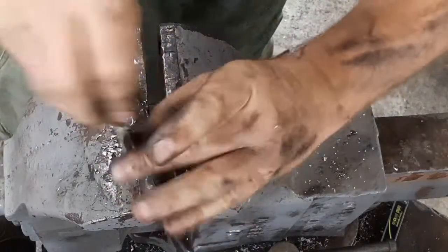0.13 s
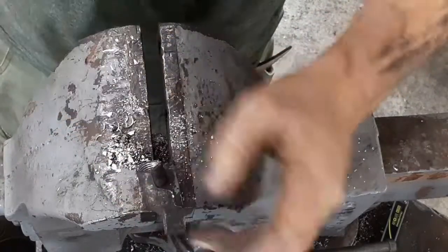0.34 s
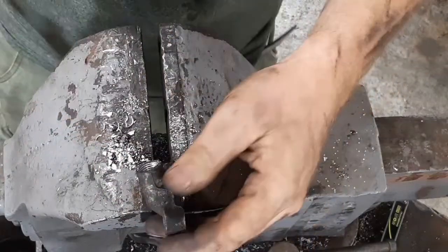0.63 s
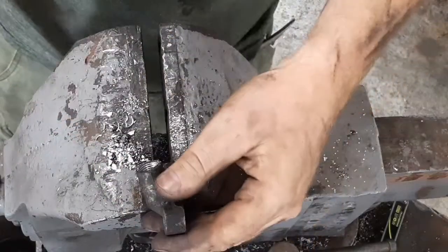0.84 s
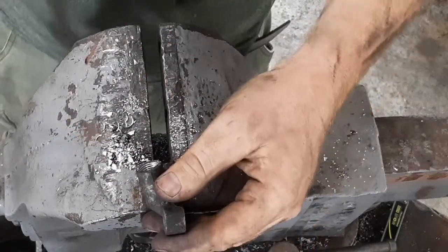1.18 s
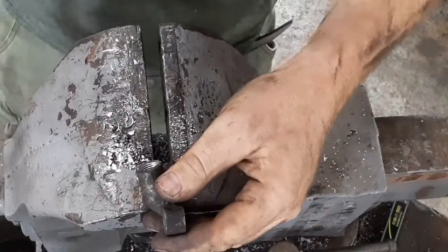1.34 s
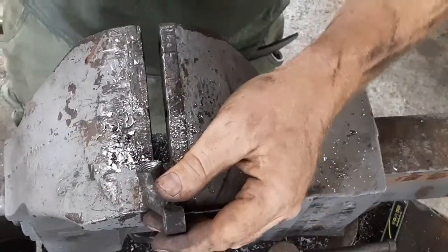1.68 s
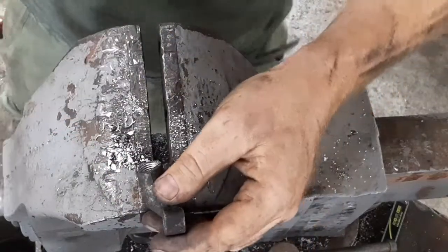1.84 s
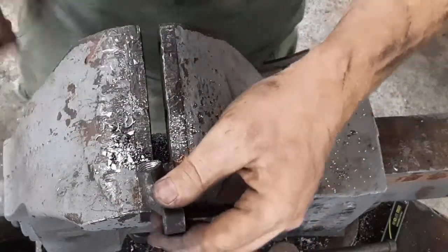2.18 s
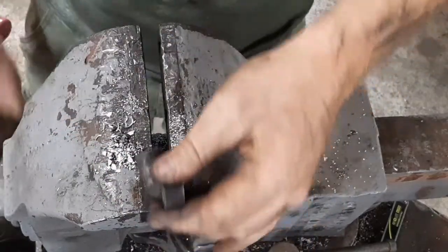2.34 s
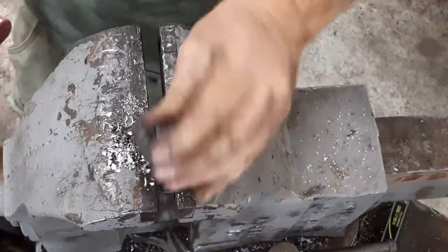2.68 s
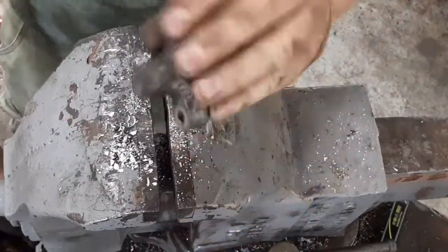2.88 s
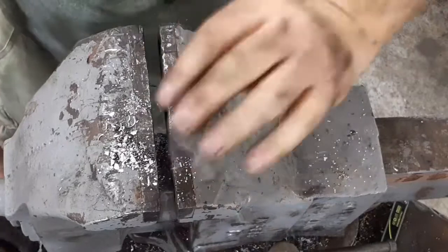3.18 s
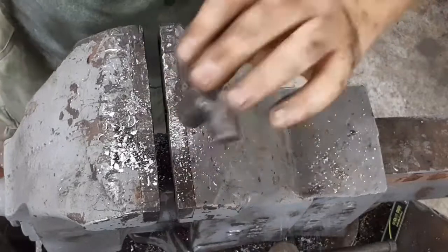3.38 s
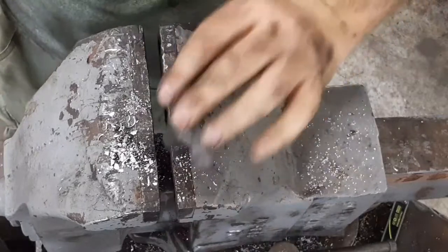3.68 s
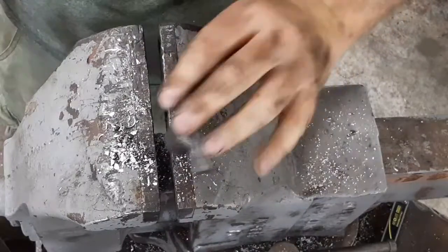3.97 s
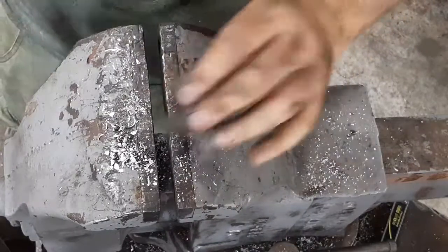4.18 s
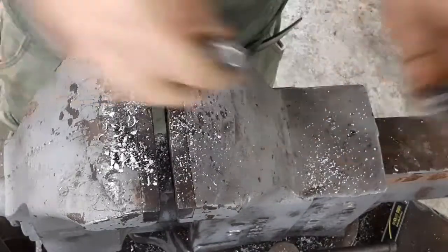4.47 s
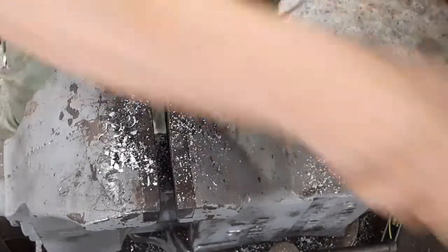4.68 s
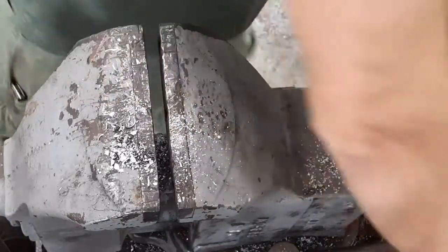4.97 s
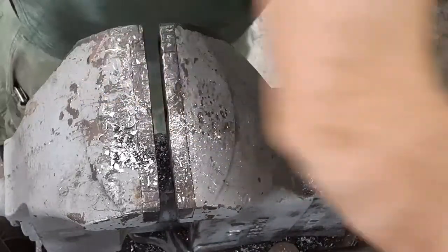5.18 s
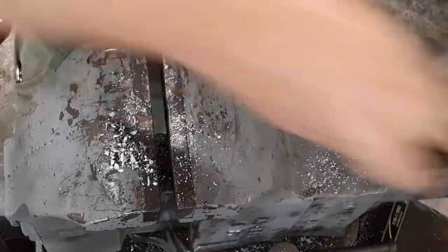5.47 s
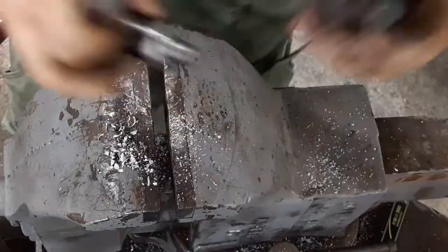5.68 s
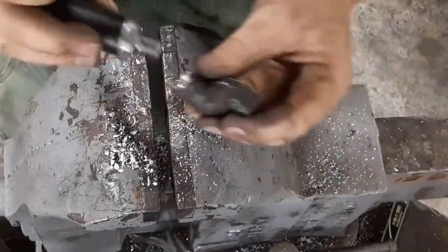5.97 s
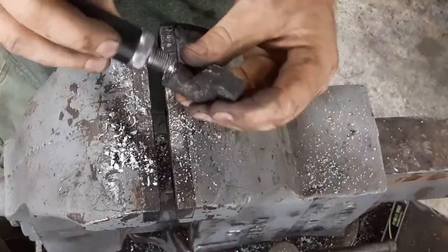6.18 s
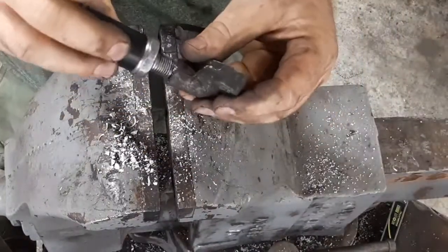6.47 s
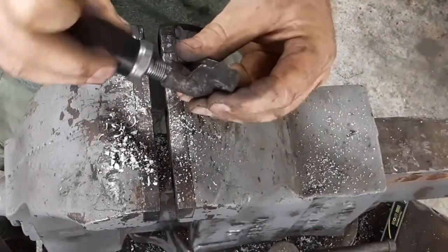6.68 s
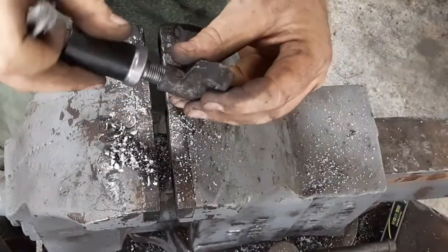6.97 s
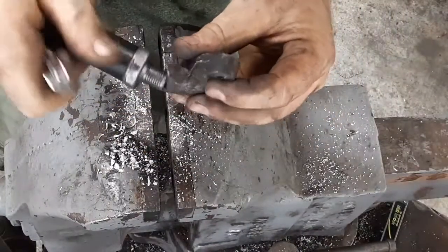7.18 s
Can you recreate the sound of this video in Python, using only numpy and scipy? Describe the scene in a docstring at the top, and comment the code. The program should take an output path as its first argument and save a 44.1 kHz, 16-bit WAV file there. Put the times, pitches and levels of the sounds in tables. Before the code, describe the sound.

A tiny metallic rasp ends at once, followed by faint hand rustles. A dry bench vise screw groans and grinds loudly with ringing squeal, then two shorter pulls; its handle drops with a dull rattling thud. A steel part raps the jaw four times, the last ones bright and sharp. Soft skin brushing and small steel clicks follow. Close microphone, small reverberant workshop, very faint air and motor hum.

```python
"""A hand tap leaves a fresh thread in a steel part with a last rasp, in a small hard-walled workshop.
Then the bench vise is wound open: its dry screw grinds and judders, its handle bar rings, and the handle drops.
The part is knocked on the jaw four times to shed its chips, then fingers rub and click it against a bolt.
Rubbing sounds are random tiny slips played through the resonances of steel; knocks and clicks are short
filtered bursts. Reverberation surrounds each event, and faint air noise and a motor hum lie underneath."""
import sys
import numpy as np
from scipy import signal
from scipy.fft import rfft, irfft
from scipy.io import wavfile

SR = 44100
rng = np.random.default_rng(int(sys.argv[2]) if len(sys.argv) > 2 else 0)


def waveform_to_disk(signal):
    """Save audio, clipped to [-1, 1], as 16-bit WAV at the path in sys.argv[1]."""
    frames = np.transpose(np.atleast_2d(signal))
    scaled = np.clip(frames, -1, 1) * 32767
    samples = np.round(scaled).astype(np.int16)
    wavfile.write(sys.argv[1], SR, samples)


N = 323694
TIME = np.arange(N) / SR   # seconds

# how long the workshop echoes at each pitch: pitch_hz, time to fall by 60 dB_s
ROOM_T60 = [(100, .55), (400, 0.4), (2500, 0.42), (6000, 0.35), (14000, 0.29)]
# how alike the left and right sides of the echo are: pitch_hz, correlation (no unit, -1 to 1)
LIKENESS = [(60, 0.93), (130, 0.4), (300, 0.43), (550, 0.41), (1200, -0.23), (4000, 0.0093), (12000, -0.11)]

# damped sound of the tap's cutting edges: pitch_hz, level_db
TAP_COLOUR = [(60, -25), (200, -25), (320, -14), (520, -15), (1000, 1), (1700, -5), (2470, -10.5),
              (4500, -14.5), (7000, -39), (11000, -34.5), (13000, -28), (15500, -46)]
# resonances of the tap and its wrench: pitch_hz, width_hz, level_db
TAP_MODES = [(1265, 64, -3.5), (1300, 5.1, -12), (1627, 64, -10), (1769, 73, -7.5), (2993, 72, -6.5),
             (4640, 190, -15), (9400, 120, -28), (10700, 130, -25), (12500, 120, -10.5), (13770, 120, -17)]
# the last rasp holds, then fades as the thread lets go; the level is set before the tap's own sound
TAP_DB, TAP_HOLD_S, TAP_FADE_DB_PER_S = -30.5, 0.022, 514.5

# still air in the room: pitch_hz, level_db
AIR_COLOUR = [(15, -55), (25, -24), (48, -12.5), (200, -8.5), (300, -9.5), (400, -12.5), (520, -15),
              (800, -20), (1100, -21.5), (1400, -21.5), (1900, -24.5), (2300, -25), (3500, -26),
              (5200, -22.5), (8000, -33), (9800, -33.5), (11500, -20.5), (15800, -21)]
AIR_DB = -69
# tones of a distant motor: pitch_hz, level_db
HUMS = [(59.2, -84.5), (526, -78), (641, -93), (1302, -96), (2234, -97)]

# strokes of the hands over the vise and the pieces:
# start_s, length_s, brush of skin level_db, sliding steel level_db
STROKES = [(0.177, 0.042, -64, -66), (.335, 0.013, -67, -73), (0.469, 0.024, -67.5, -107),
           (0.612, 0.053, -70, -94), (1.668, 0.22, -58.5, -69), (1.89, 0.075, -69, -67),
           (2.07, 0.14, -61, -83), (2.517, 0.15, -70.5, -82.5), (2.731, 0.029, -70, -61),
           (3.079, 0.053, -88, -69), (4.46, 0.035, -72, -76), (4.915, 0.065, -91, -76),
           (5.008, 0.048, -59.5, -57), (5.078, 0.079, -73, -65), (5.283, 0.035, -82, -72),
           (5.382, 0.056, -72.5, -69.5), (5.54, .15, -63, -71), (5.714, 0.022, -55, -60.5),
           (5.78, 0.22, -73.5, -76.5), (7.04, .025, -53.5, -70), (7.091, 0.087, -64, -68.5),
           (7.257, 0.014, -52.5, -65.5), (7.323, .025, -65, -79)]
STROKE_ATTACK_S, STROKE_RELEASE_S = 0.023, 0.076   # time to rise and to fall by 30 dB
# skin brushing over gritty steel: pitch_hz, level_db
BRUSH_COLOUR = [(2500, -13.5), (4500, -5.5), (6200, 3.5), (8500, -8), (10500, -5), (12000, 0), (15000, 2.5),
                (16000, -17.5)]
# steel pieces sliding in the fingers: pitch_hz, level_db
SLIDE_COLOUR = [(150, -37), (250, -9), (539, 3), (700, -4.5), (870, 0), (1670, -4), (3600, -6.5),
                (4350, -8.5), (6250, -20), (8000, -17.5), (10400, -39), (17600, -120)]

# three pulls on the vise screw, a curve each: time_s, groan of the casting level_db, dry grit level_db
LONG_PULL = [(0.88, -63.5, -88.5), (0.908, -48.5, -47.5), (0.954, -41.5, -50.5), (1.038, -35.5, -35.5),
             (1.092, -34.5, -38.5), (1.206, -31.5, -33), (1.232, -31, -31.5), (1.268, -31, -27),
             (1.326, -36.5, -39), (1.35, -31.5, -31), (1.45, -35, -48.5), (1.532, -63, -64),
             (1.6, -72, -67)]
SECOND_PULL = [(1.68, -67, -74), (1.724, -51.5, -55), (1.776, -44, -57), (1.83, -30, -40),
               (1.848, -40, -54), (2.0, -64, -77)]
THIRD_PULL = [(2.0, -59, -73), (2.016, -62.5, -78), (2.08, -48.5, -62), (2.154, -49.5, -64),
              (2.232, -36.5, -39.5), (2.32, -51.5, -65), (2.45, -79, -80)]
# damped groan of the vise casting: pitch_hz, level_db
GROAN_COLOUR = [(45, -27.5), (70, -7), (115, -2.5), (170, 1), (230, -6.5), (310, -4), (400, 0), (510, -6),
                (620, -5.5), (800, 3), (1000, -3), (1400, -5.5), (1900, -17.5), (2600, -35.5)]
# resonances of the vise casting: pitch_hz, width_hz, level_db
VISE_MODES = [(110, 16, -14.5), (301, 44, -5), (364, 26, -16), (675, 22, -6.5), (781, 30, -9),
              (842, 51, -4), (1001, 47, -5.5), (1088, 47, -10.5)]
# dry grinding of the screw: pitch_hz, level_db
GRIT_COLOUR = [(700, -20.5), (1200, 2), (1800, 0), (2170, -0.5), (2450, -11.5), (3200, -6), (4000, -12.5),
               (4500, -5), (5600, -18), (6500, -11.5), (8000, -27), (10400, -62.5)]
# the handle bar slides through its eye with each pull: start_s, rise_s, fall_s, ring level_db, squeal level_db
BAR_SLIDES = [(.92, .32, .2, -42.5, -42.5), (1.71, 0.055, 0.16, -59.5, -54.5),
              (2.02, 0.22, 0.089, -53.5, -43.5)]
BAR_SWELL_DB = 21.5   # a slide swells by this much, then sinks back
# upper resonances of the handle bar, which ring: pitch_hz, width_hz, level_db
BAR_MODES = [(6430, 90, -3.5), (8770, 150, -0.5), (11490, 280, -1), (14320, 190, -0.5)]
# lower resonances of the handle bar, which squeal as it slides: pitch_hz, width_hz, level_db
SQUEAL_MODES = [(1581, 110, -6.5), (2544, 210, -9), (3230, 200, -11.5), (4340, 170, -1), (5860, 60, -9.5),
                (6436, 200, -1.5)]

# the screw catches and jerks free: start_s, energy level_db
CATCHES = [(.903, -18.5), (1.25, -6), (1.767, -21.5), (2.023, -28), (2.219, -10)]
# damped sound of a catch: pitch_hz, level_db
CATCH_COLOUR = [(80, -15), (300, -1), (800, 5), (1600, -4.5), (2600, -14), (3600, -10), (4500, -6),
                (6400, -12), (8000, -30.5), (12000, -52.5)]
# dry steel sticks and slips at one resonance: start_s, length_s, pitch_hz, level_db
JUDDERS = [(0.987, 0.062, 1100, -29.5), (1.027, 0.04, 1113, -33), (1.055, 0.04, 809, -33),
           (1.187, 0.091, 1100, -33.5), (1.236, 0.054, 304, -30.5), (1.268, 0.04, 2172, -31),
           (1.398, 0.05, 685, -35.5), (1.39, 0.083, 1101, -38), (2.027, 0.3, 4310, -55.5),
           (2.219, 0.098, 688, -44)]
JUDDER_WAVER_HZ, JUDDER_FLUTTER_DB = 16, 1.2   # typical wander of pitch and strength

# light clicks of steel on steel: start_s, energy level_db, lowest pitch_hz, highest pitch_hz
TICKS = [(1.592, -31, 6760, 14000), (2.731, -34, 1080, 6000), (3.326, -45, 8000, 14840),
         (3.631, -28, 1600, 4560), (5.008, -35, 601, 2380), (5.689, -21, 290, 2080),
         (5.696, -27.5, 300, 1810), (5.971, -35.5, 497, 1450), (6.382, -36, 1000, 2620),
         (6.755, -38, 2170, 2995), (7.043, -35, 2180, 6520), (7.1711, -21, 2090, 4030)]
# the handle drops against its stop and rattles: start_s, energy level_db
THUDS = [(2.813, -10.5), (2.8201, -10.5), (2.827, -5.5), (2.841, -11.5), (2.886, -17.5)]
# dull sound of the vise when the handle lands: pitch_hz, level_db
THUD_COLOUR = [(30, -23), (60, -10), (95, 2.5), (160, -4.5), (220, -0.5), (290, 5), (380, -1), (530, -4.5),
               (608, -4), (680, -3), (820, -7), (1050, -15), (1400, -21), (2200, -32.5), (5000, -45.5),
               (9000, -86)]
# resonances of the bench: pitch_hz, width_hz, level_db
BENCH_MODES = [(131.3, 39, -16), (296.3, 28, -1), (616, 28, -5)]

# the part meets the jaw, levels as energies: start_s, first contact level_db, chatter level_db,
# chatter length_s, room level_db, sharp edge level_db, lowest pitch_hz
KNOCKS = [(3.6217, -12.5, -12.5, 0.019, -18, -30, 201), (3.7742, -0.5, 1, 0.038, -0.5, -26, 110),
          (3.9371, -1, 9, 0.06, 11.5, -3.5, 420), (4.1117, -8, 11.5, 0.03, 10, -10.5, 350)]
# damped sound of steel on the jaw: pitch_hz, level_db
KNOCK_COLOUR = [(40, -28), (120, -10.5), (300, -14.5), (450, -13.5), (600, -14), (800, -3), (1250, -5),
                (1700, -3), (2100, -2), (2950, 0), (3400, -6), (4500, -5.5), (5300, -12.5), (6300, -11),
                (9200, -24), (11000, -23.5), (14800, -28), (16000, -48)]
# the part ringing on the jaw: pitch_hz, width_hz, level_db
PART_MODES = [(1096, 8.3, -2.5), (1468, 6.4, -5.5), (1913, 14, -6.5), (2190, 4.5, -6), (2711, 14, -11),
              (3005, 8.8, -3), (3602, 8, -8), (3750, 9.1, -10), (4160, 6.2, -11), (4570, 5, -8),
              (4510, 4.5, -10), (5770, 18, -10.5), (6230, 12, -13), (7970, 22, -16), (10450, 25, -18.5)]
RING_DB = -11.5   # ring of the part against its chatter
# crack of a sharp edge meeting the jaw: lowest pitch_hz, highest pitch_hz
EDGE_BAND_HZ = (12800, 17000)


def from_db(db):
    """Turn decibels into a gain."""
    return 10 ** (np.asarray(db) / 20)


def rms_one(x):
    """Scale a sound to an average strength (rms) of 1."""
    return x / np.sqrt(np.mean(x ** 2) + 1e-20)


def unit(response):
    """Scale a response to a total energy of 1."""
    return response / np.sqrt(np.sum(response ** 2) + 1e-20)


def gains(rows):
    """Draw gain curves through rows of (time, dB, ...), with practically nothing outside their span."""
    s, *columns = np.transpose(rows)
    return [from_db(np.interp(TIME, s, column, left=-200, right=-200)) for column in columns]


def at_hz(points, hz):
    """Read a table between its pitches, spacing them as the ear does (log frequency)."""
    known_hz, values = np.transpose(points)
    return np.interp(np.log(hz + 1), np.log(known_hz), values)


def drift(points_per_s):
    """Wander at random, in straight lines between random points; rms 1."""
    points = rng.standard_normal(4000)
    return rms_one(np.interp(TIME * points_per_s, np.arange(len(points)), points))


def friction(slips_per_s, spread_db, surge_db):
    """Rubbing steel makes tiny slips of uneven size that come in surges; rms 1."""
    slips = (rng.random(N) < slips_per_s / SR) * rng.choice([-1, 1], N)
    size_db = spread_db * np.clip(rng.standard_normal(N), -2, 2)
    return rms_one(slips * from_db(size_db + surge_db * drift(90)))


def burst(t60):
    """A quick, dying run of tiny contacts, falling 60 dB in t60 seconds; energy 1."""
    t = TIME[:SR // 5]
    return unit(rng.standard_normal(len(t)) * np.exp(-np.log(1000) * t / t60))


def body(spectrum, size=4096):
    """A heavily damped body answers at once, with this spectrum (a minimum-phase response)."""
    hz = np.arange(size // 2 + 1) * SR / size
    cepstrum = irfft(np.log(from_db(at_hz(spectrum, hz))))
    # folding the second half onto the first makes the response start at once
    cepstrum[1:size // 2] *= 2
    cepstrum[size // 2 + 1:] = 0
    return unit(irfft(np.exp(rfft(cepstrum))))


def mode(hz, width_hz):
    """One resonance rings as a dying cosine; a wider one dies sooner; energy 1."""
    t = TIME[:SR // 2]
    return unit(np.cos(2 * np.pi * hz * t) * np.exp(-np.minimum(np.pi * width_hz * t, 50)))


def band(low_hz, high_hz, order=4):
    """A heavily damped contact sounds in one band of pitches; energy 1."""
    edges = np.clip([low_hz, max(high_hz, 1.1 * low_hz)], 20, .48 * SR)
    bandpass = signal.butter(order, edges, "band", fs=SR, output="sos")
    return unit(signal.sosfilt(bandpass, signal.unit_impulse(SR // 2) + 1e-18))


def through(x, response):
    """Play a signal through a response."""
    return signal.fftconvolve(x, response)[:len(x)]


def rubbed(force, modes, wander_db):
    """The contact point moves, so each resonance is fed more or less strongly."""
    out = np.zeros(N)
    for hz, width_hz, db in modes:
        ring = mode(hz, width_hz)
        # a doubled resonance keeps the valleys between the modes dark
        resonance = unit(through(ring, ring))
        feed = rms_one(from_db(wander_db * drift(21.43)))
        out += from_db(db) * through(force * feed, resonance)
    return out


def add(track, s, sound):
    """Mix a short sound into a track at time s in seconds."""
    start = int(s * SR)
    track[:, start:start + sound.shape[1]] += sound[:, :N - start]


def diffuse(size):
    """White noise arriving from all sides, with left and right as alike as the likeness table says."""
    mid, side = rfft(rng.standard_normal((2, size)))
    alike = np.clip(at_hz(LIKENESS, np.arange(len(mid)) * SR / size), -1, 1)
    return irfft(np.sqrt(1 + alike) * mid + np.sqrt(1 - alike) * side * [[1], [-1]], size)


def workshop(build_s=0.012, gap_s=0.001):
    """Reflections build up, then die, mostly the treble first; energy about 1 on each side."""
    hz, t, cells = signal.stft(diffuse(size=32768), SR, nperseg=256)
    decay = from_db(-60 * t / at_hz(ROOM_T60, hz)[:, None])
    tail = signal.istft(cells * decay, SR)[1]
    tail *= 1 - np.exp(-np.maximum(TIME[:tail.shape[1]] - gap_s, 0) / build_s)
    return np.sqrt(2) * unit(tail)


def place(x, room_db, pan_db=6.0, lag_samples=4):
    """The direct sound reaches the right side slightly late unless the lag is 0, and the room adds echoes."""
    paths = from_db(room_db) * workshop()
    paths[0, 0] += from_db(pan_db / 2)
    paths[1, lag_samples] += from_db(-pan_db / 2)
    return np.array([through(x, path) for path in paths])


def tap():
    """The cutting edges rasp out of the thread and set tap and wrench ringing."""
    engaged = from_db(TAP_DB - TAP_FADE_DB_PER_S * np.clip(TIME - TAP_HOLD_S, 0, .5))
    force = engaged * friction(2500, spread_db=2.1, surge_db=2.0)
    rasp = from_db(1.5) * through(force, body(TAP_COLOUR))
    ringing = from_db(-7) * rubbed(force, TAP_MODES, wander_db=1.8)
    return place(rasp + ringing, room_db=-1.5, pan_db=4.0, lag_samples=0)


def room_tone():
    """Still air is shaped noise; a faint motor hum is a few tones wavering in pitch and strength."""
    air = np.array([through(side, body(AIR_COLOUR)) for side in diffuse(size=N)])
    # the tones share one unsteady clock, so they waver in pitch together
    motor_time = np.cumsum(1 + 0.00077 * drift(11)) / SR
    hum = np.zeros(N)
    for hz, db in HUMS:
        strength = np.sqrt(2) * from_db(db + 2.7 * drift(7.1))
        hum += strength * np.sin(2 * np.pi * hz * motor_time)
    left_right_tilt = from_db(0.46 * np.array([[1], [-1]]))
    return (from_db(AIR_DB) * air + hum) * left_right_tilt


def stroke(s, length):
    """One stroke of the hand rises, holds and dies away."""
    before = np.maximum(s - TIME, 0) / STROKE_ATTACK_S
    after = np.maximum(TIME - s - length, 0) / STROKE_RELEASE_S
    return from_db(-30 * np.minimum(before + after, 8))


def handling():
    """Skin brushes over gritty steel and the pieces slide in the fingers, both as streams of tiny slips."""
    brush, slide = sum(np.outer(from_db([skin_db, steel_db]), stroke(s, length))
                       for s, length, skin_db, steel_db in STROKES)
    skin = through(brush * friction(11000, spread_db=2.7, surge_db=3.9), body(BRUSH_COLOUR))
    steel = through(slide * friction(4000, spread_db=2.4, surge_db=2.2), body(SLIDE_COLOUR))
    return place(skin + steel, room_db=-2.0, pan_db=6.5)


def bar_slides():
    """The bar's ring and squeal swell as each pull gathers speed and sink as it ends."""
    curves = np.zeros((2, N))
    for s, rise, fall, ring_db, squeal_db in BAR_SLIDES:
        swell = gains([(s, -BAR_SWELL_DB), (s + rise, 0), (s + rise + fall, -BAR_SWELL_DB)])[0]
        curves += np.outer(from_db([ring_db, squeal_db]), swell)
    return curves


def screw():
    """The dry screw grinds in its nut; its slips shake the casting and the handle bar."""
    groan, grit = np.sum([gains(pull) for pull in (LONG_PULL, SECOND_PULL, THIRD_PULL)], axis=0)
    ring, squeal = bar_slides()
    slips = friction(5000, spread_db=3.0, surge_db=1.8)
    casting = from_db(-4.0) * through(groan * slips, body(GROAN_COLOUR))
    casting += from_db(-10) * rubbed(groan * slips, VISE_MODES, wander_db=5.0)
    grinding = from_db(-1.0) * through(grit * slips, body(GRIT_COLOUR))
    bar = from_db(-5.5) * rubbed(ring * slips, BAR_MODES, wander_db=3.5)
    bar += from_db(-6) * rubbed(squeal * slips, SQUEAL_MODES, wander_db=3.0)
    vise = place(casting + grinding, room_db=-4.5, pan_db=3.0, lag_samples=3)
    return vise + place(bar, room_db=-7, pan_db=13.0)


def catches():
    """Each jerk of the screw is a quick, dying burst of slips."""
    force = np.zeros((1, N))
    for s, db in CATCHES:
        add(force, s, from_db(db) * burst(t60=.05)[None])
    return place(through(force[0], body(CATCH_COLOUR)), room_db=-4.5, pan_db=2.0, lag_samples=3)


def judders():
    """Sticking and slipping locks on to a resonance for a moment: a tone wavering in pitch and strength."""
    out = np.zeros(N)
    waver_hz = JUDDER_WAVER_HZ * drift(160)
    flutter = from_db(JUDDER_FLUTTER_DB * drift(120))
    for s, length, hz, db in JUDDERS:
        span = slice(int(s * SR), int((s + length) * SR))
        swell = signal.windows.tukey(span.stop - span.start, .6) * flutter[span]
        tone = np.sin(2 * np.pi * np.cumsum(hz + waver_hz[span]) / SR)
        out[span] += from_db(db) * np.sqrt(2) * swell * tone
    return place(out, room_db=-5, pan_db=-1.5, lag_samples=1)


def ticks():
    """Light touches of steel are single clicks, each sounding in its own band."""
    out = np.zeros((2, N))
    for s, db, low_hz, high_hz in TICKS:
        add(out, s, from_db(db) * place(band(low_hz, high_hz), room_db=-6))
    return out


def thud():
    """The heavy vise and its bench answer the falling handle dully."""
    out, t = np.zeros((1, N)), TIME[:SR // 2]
    casting = body(THUD_COLOUR)
    bench = sum(from_db(db) * mode(hz, width_hz) for hz, width_hz, db in BENCH_MODES)
    bandpass = signal.butter(3, [85, 700], "band", fs=SR, output="sos")
    cushioned = from_db(-14.5) * signal.sosfilt(bandpass, bench)
    for s, db in THUDS:
        # after each bounce the loose bar settles over a few ms
        settling = rng.standard_normal(len(t)) * np.exp(-t / .005)
        landing = unit(through(settling, casting)) + cushioned
        add(out, s, from_db(db) * landing[None])
    return place(out[0], room_db=0.5, pan_db=5.0, lag_samples=1)


def knocks():
    """A sharp first contact, brief chatter scattered off the vise, the hand-damped ring, then the room."""
    out, t = np.zeros((2, N)), TIME[:SR // 10]
    for s, contact_db, chatter_db, chatter_s, room_db, edge_db, low_hz in KNOCKS:
        paths = from_db(room_db) * workshop()
        # chatter_s is the time the chatter takes to fall by 60 dB
        chatter = unit(diffuse(size=len(t)) * np.exp(-np.log(1000) * t / chatter_s))
        paths[:, :len(t)] += np.sqrt(2) * from_db(chatter_db) * chatter
        # the first contact reaches the right side 5 samples late
        paths[[0, 1], [0, 5]] += from_db(contact_db)
        # a short contact puts little into the bass
        highpass = signal.butter(2, low_hz, "high", fs=SR, output="sos")
        steel = signal.sosfilt(highpass, body(KNOCK_COLOUR, size=2048))
        add(out, s, np.array([through(path, steel) for path in paths]))
        for hz, width_hz, db in PART_MODES:
            # each mode reaches each side with a strength of its own
            side_db = rng.normal(0, 2.5, (2, 1))
            ring = rng.choice([-1, 1]) * mode(hz, width_hz)
            add(out, s, from_db(chatter_db + db + RING_DB + side_db) * ring)
        crack = through(band(*EDGE_BAND_HZ), burst(t60=.02))
        add(out, s, from_db(edge_db) * place(crack, room_db=-3.0, pan_db=1.0))
    return out


def scene():
    """Everything at the bench, added together."""
    vise = screw() + catches() + judders()
    contacts = ticks() + thud() + knocks()
    return tap() + room_tone() + handling() + vise + contacts


def record(dry):
    """The microphone drops the deep bass, full scale limits the peaks, the top is cut."""
    bass_cut = signal.butter(3, 41, "high", fs=SR, output="sos")
    thinned = signal.sosfilt(bass_cut, dry)
    top_cut = signal.ellip(10, .1, 80, 15950, fs=SR, output="sos")
    return signal.sosfilt(top_cut, np.clip(thinned, -1, 1))


dry = scene()
out = record(dry)
waveform_to_disk(out)
```